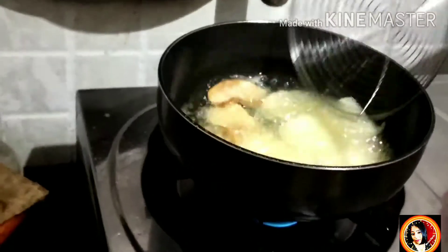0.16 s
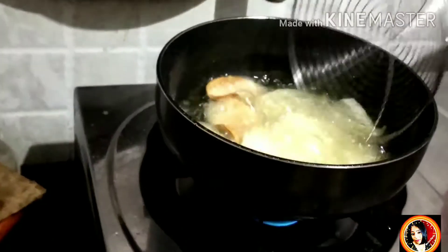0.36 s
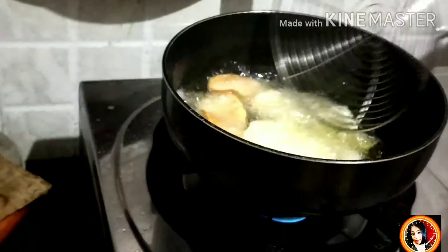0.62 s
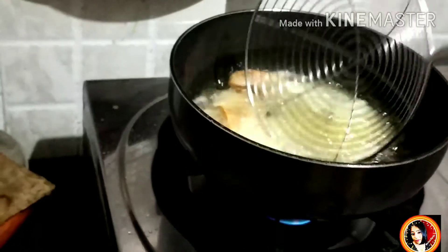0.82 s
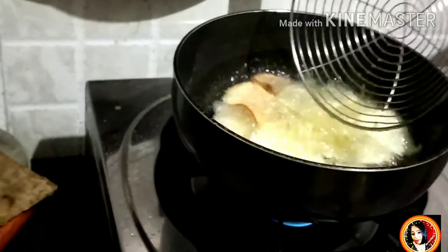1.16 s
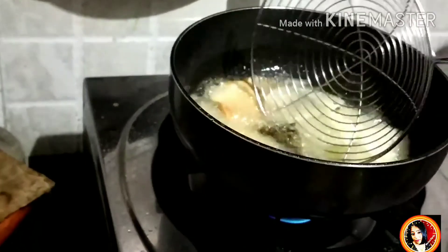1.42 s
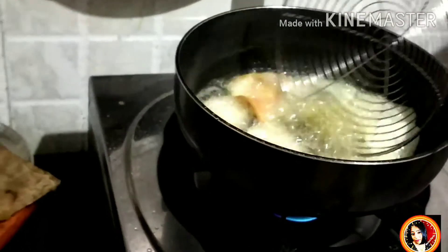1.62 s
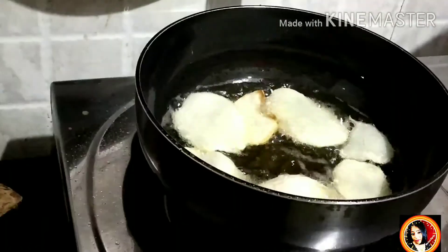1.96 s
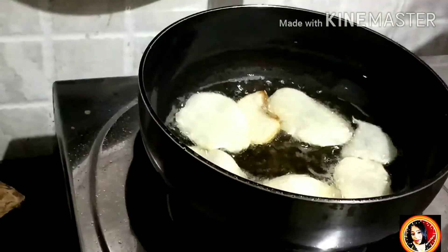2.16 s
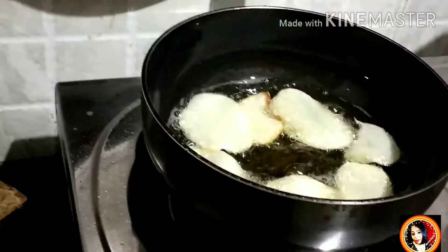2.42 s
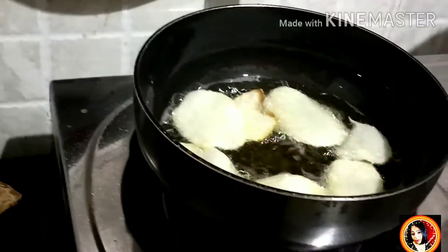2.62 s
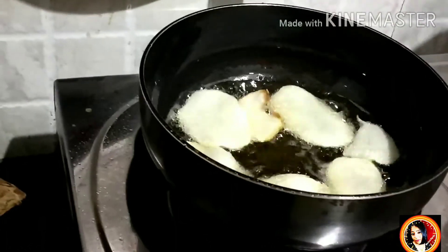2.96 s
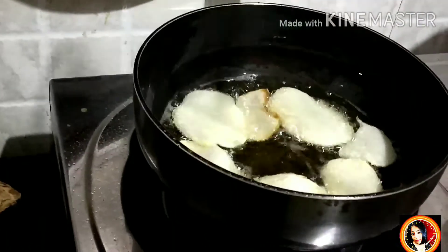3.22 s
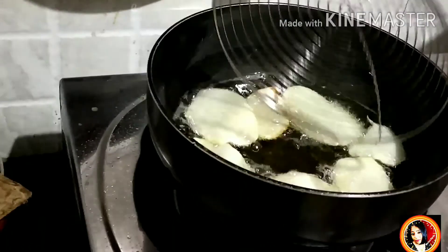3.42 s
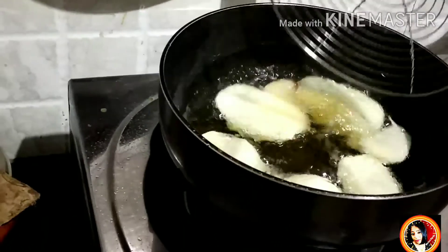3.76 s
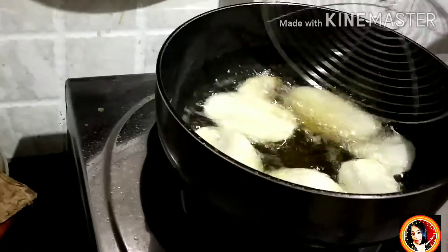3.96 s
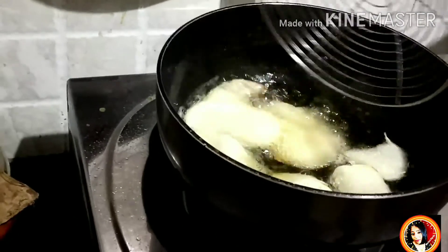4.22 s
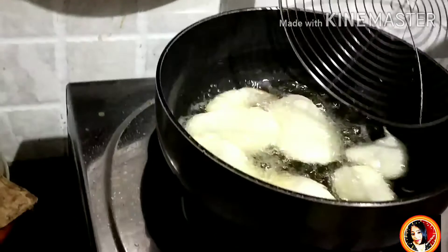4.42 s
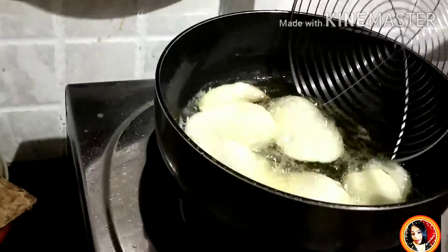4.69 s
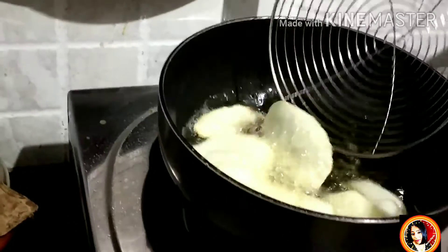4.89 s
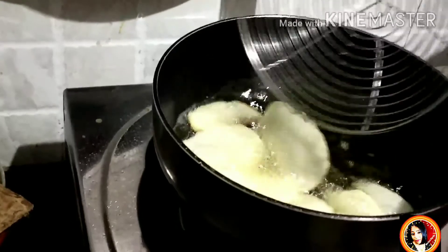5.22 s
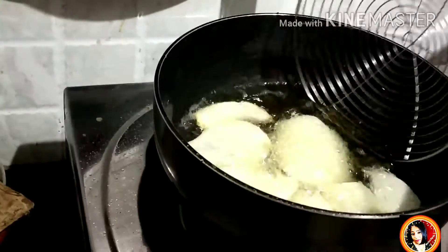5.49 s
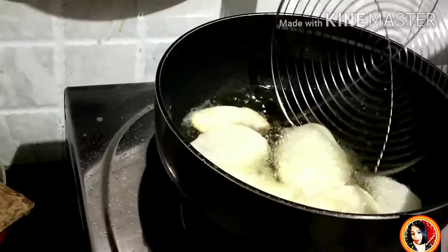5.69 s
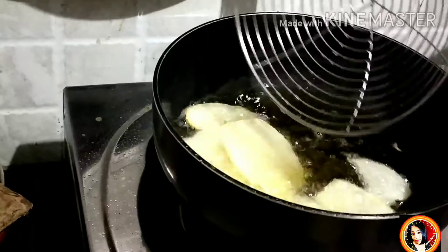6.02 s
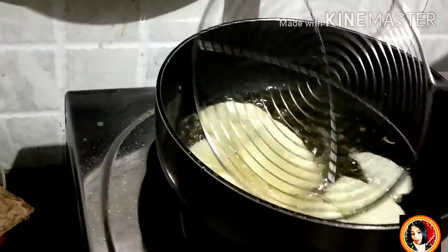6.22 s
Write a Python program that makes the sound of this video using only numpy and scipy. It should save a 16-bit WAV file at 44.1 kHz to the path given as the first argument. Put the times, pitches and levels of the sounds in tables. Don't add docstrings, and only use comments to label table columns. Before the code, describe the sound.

Close-up deep frying: dense hissing and wet pops at first, a metal skimmer bumping the pan, then a sudden change to gentler sizzling with sparse crackles.

```python
import sys
import numpy as np
from scipy import signal
from scipy.fft import rfft, irfft
from scipy.io import wavfile
from scipy.ndimage import uniform_filter1d

SR = 44100
rng = np.random.default_rng(int(sys.argv[2]) if len(sys.argv) > 2 else 0)


def magnitude_from_level(level_db):
    exponent = np.asarray(level_db, float) / 20
    return 10 ** exponent


def master(y):
    cut = np.clip(np.atleast_2d(y).T, -1, 1)
    pcm = np.round(cut * 32767)
    wavfile.write(sys.argv[1], SR, pcm.astype(np.int16))


N = 280476
PORT_LAG_S = 5e-5


def evened(x):
    return x / np.sqrt(np.mean(x ** 2) + 1e-20)


def read(points, hz):
    f, value = np.transpose(points)
    return np.interp(np.log(hz + 1), np.log(f + 1), value)


def curve(rows, axis):
    rows = np.asarray(rows)
    return np.interp(np.arange(N) / SR, rows[:, 0], rows[:, axis])


def add(mix, s, sound):
    part = mix[..., round(s * SR):][..., :sound.shape[-1]]
    part += sound[..., :part.shape[-1]]


def ring(hz, t60, rise_s, glide=0.):
    t = np.arange(int(t60 * SR) + 8) / SR
    tone = np.sin(2 * np.pi * hz * t * (1 + glide * t / t60))
    tone = tone * magnitude_from_level(-60 * t / t60) * (1 - np.exp(-t / rise_s))
    return tone / abs(tone).max()


def echoes(x, t60, gap_s, shared=0.):
    size, taps_per_s = SR // 3, 1500
    t = np.arange(size) / SR
    taps = rng.choice([-1., 1.], (2, size)) * (rng.random((2, size)) < taps_per_s / SR)
    taps = (taps + shared * taps[::-1]) * magnitude_from_level(-60 * t / t60) * (1 - np.exp(-t / gap_s))
    return signal.fftconvolve(np.atleast_2d(x), taps / np.linalg.norm(taps[0]), axes=1)[:, :N]


def centred(x):
    return np.array([x, np.roll(x, -round(PORT_LAG_S * SR))])


def frying(axis):
    # start_s, level_db
    vigour = [(0, 9), (.02, 0.5), (.23, -1), (.35, 0.5), (.8, 2), (.93, 1.5), (1.56, 2.5), (1.89, 0.5),
              (1.9, -2), (2.13, 1.5), (2.67, 4.5), (3.01, 2), (4.15, 4.5), (4.93, 0.5), (5.43, 6),
              (5.79, 0.5), (6.06, 1.5), (6.36, 7.5)]
    # middle_s, fizz_db, boil_db, half_length_s
    lulls = [
        (0.26, -2.5, 2, 0.047),
        (0.368, -7, -1, 0.0098),
        (0.758, -7, 1, 0.04),
        (1.671, -3.5, -6.5, 0.025),
    ]
    change_s, lull_onset = 1.892, 0.53
    fierce_db, calm_db = ((-27.5, -32.5), (-25, -41.5))[axis - 1]
    follows = (0.087, 1)[axis - 1]
    t = np.arange(N) / SR
    db = np.where(t < change_s, fierce_db, calm_db) + follows * curve(vigour, axis=1)
    for lull in lulls:
        half_s = lull[3] * np.where(t < lull[0], lull_onset, 1)
        db = db + lull[axis] * np.exp(-((t - lull[0]) / half_s) ** 2)
    return db


def fizz(patchy_db=1.51, flicker_db=0.5):
    # pitch_hz, level_db (per Hz)
    hiss_colour = [(140, -69), (190, -3.5), (320, -11.5), (3000, -11.5), (4200, -7.5), (6000, -8.5),
                   (11000, -5.5), (15500, -10.5)]
    # pitch_hz, likeness (1 = same)
    likeness = [(60, 0.64), (180, 1), (550, 0.47), (1650, 0.1), (4970, 0.0078), (15000, 0.01)]
    # pitch_hz, half_width_hz, level_db
    reflections = [(400, 22, -1), (2780, 67, 2), (3690, 130, -2), (6980, 76, -2)]
    frames, hz = N // 128 + 5, np.fft.rfftfreq(512, 1 / SR)
    a, b, c, d, patches = rng.standard_normal((frames, len(hz), 5)).T
    patches = evened(uniform_filter1d(uniform_filter1d(patches, 8, axis=0), 20, axis=1))
    flicker = evened(uniform_filter1d(rng.standard_normal(frames), 5))
    same = np.clip(read(likeness, hz), -1, 1)[:, None]
    left, other = a + 1j * b, c + 1j * d
    z = np.array([left, same * left + np.sqrt(1 - same ** 2) * other])
    colour_db = read(hiss_colour, hz)
    for middle_hz, half_width_hz, db in reflections:
        colour_db = colour_db + db * np.exp(-((hz - middle_hz) / half_width_hz) ** 2)
    flicker_band = hz[:, None] > 2500
    z = z * magnitude_from_level(colour_db[:, None] + patchy_db * patches + flicker_db * flicker * flicker_band)
    out = evened(signal.istft(z, nperseg=512, noverlap=384)[1][:, :N])
    return magnitude_from_level(frying(axis=1) + 6.0) * out


def grains(pitches_hz, colour_db, per_s, cycles, spread_db, cross):
    out, count = np.zeros((2, N)), int(per_s / len(pitches_hz) * N / SR)
    for hz, db in zip(pitches_hz, colour_db):
        clicks = np.zeros((2, N))
        strength = magnitude_from_level(db + spread_db * np.minimum(rng.exponential(1, (2, count)), 4))
        np.put_along_axis(clicks, rng.integers(0, N, (2, count)), strength, axis=1)
        bubble = ring(hz, 3 * cycles / hz, 0.37 / hz, glide=0.19)
        out += signal.oaconvolve(clicks, bubble[None], axes=1)[:, :N]
    return evened(out + cross * out[::-1])


def boil():
    # pitch_hz, level_db
    bubble_colour = [(250, -66), (500, -19.5), (1000, -10), (2000, 2.5), (3000, 4), (4100, 5.5), (4700, 5)]
    hz = np.geomspace(260, 4500, 22)
    near = grains(hz, read(bubble_colour, hz), per_s=1500, cycles=4, spread_db=2.6, cross=.4)
    wet = near + magnitude_from_level(-5) * echoes(near, t60=.12, gap_s=.003)
    size_limits = signal.butter(6, [210, 4600], "band", fs=SR, output="sos")
    return magnitude_from_level(frying(axis=2) - 1.0) * evened(signal.sosfilt(size_limits, wet))


def crackle():
    hz = np.geomspace(5000, 14000, 8)
    ticks = grains(hz, 0 * hz, per_s=510, cycles=3.5, spread_db=7.5, cross=0.012)
    return magnitude_from_level(frying(axis=1) - 15.0) * ticks


def pops():
    # start_s, peak_db, pitch_hz,
    # length_cycles
    open_bursts = [(0.168, -7.5, 4100, 3.5), (0.21, -12, 2520, 4), (0.22, -6.5, 3360, 3.4),
                   (0.3282, -5, 2880, 6.1), (0.3388, -10, 1860, 7.1), (0.3586, -1.5, 1640, 4.5),
                   (0.4398, 4.5, 1830, 1.3), (0.5024, -7, 930, 0.73), (0.8019, -6.5, 1730, 1.6),
                   (0.496, -3.5, 2230, 4), (0.5333, -7.5, 1980, 7.5), (0.575, -6, 2590, 11),
                   (0.66, -4.5, 2470, 7.3), (0.5314, -5, 1690, 0.91), (0.7257, -7, 2600, 4.5),
                   (0.7328, -3, 2500, 1.5), (0.804, -10.5, 1460, 13), (0.814, -16, 1490, 11),
                   (0.822, -13, 1580, 10), (0.629, -13, 2100, 4.1), (1.381, -12, 1700, 2.4),
                   (1.0905, -4, 2120, 5.3), (1.162, -11, 2770, 11), (1.421, -10, 2780, 8),
                   (1.4485, -6.5, 2450, 11), (1.563, -6, 1500, 0.85), (1.587, -7.5, 1620, 0.95),
                   (1.606, -8, 2160, 3.4), (1.725, -10, 2630, 6.6), (1.744, -2.5, 1830, 2.1),
                   (1.77, -8, 2800, 4.6), (1.785, -7, 1940, 1), (1.879, -15.5, 2820, 4.2)]
    # start_s, peak_db, pitch_hz, length_cycles
    calm_bursts = [(2.596, -13, 3020, 5.3), (2.6888, -13.5, 3900, 12), (3.211, -12, 6640, 10),
                   (3.382, -15, 3920, 13), (3.515, -24, 4480, 7.7), (3.5646, -10, 2900, 2.1),
                   (3.5, -19.5, 2700, 18), (3.568, -16, 5000, 5.6), (3.4, -21, 2800, 4),
                   (3.3825, -21, 4600, 4), (2.5945, -21, 3800, 3), (5.2618, -21, 1300, 1.4),
                   (3.5178, -20, 5800, 4), (3.763, -23.5, 1800, 3.2), (3.832, -24, 3100, 2),
                   (3.8318, -18, 2700, 11), (3.972, -12, 2600, 14), (3.975, -20, 2700, 9.6),
                   (4.635, -17.5, 4000, 9.8), (5.262, -14.5, 2400, 7.9), (5.4015, -19, 2400, 5),
                   (6.246, -18, 3300, 2.5), (6.265, -17, 2380, 6.4), (5.323, -23, 4500, 3),
                   (2.599, -19, 3020, 12)]
    # start_s, peak_db, pitch_hz
    covered_bursts = [(0.035, -19, 2070), (0.074, -5, 3550), (0.112, -12, 2600), (0.198, -17, 1880),
                      (0.31, -14, 2780), (0.418, -14, 1680), (0.611, -21, 2630), (1.016, -24, 3300),
                      (1.042, -16, 2390), (1.126, -5, 3300), (1.219, -13, 1500), (1.236, -9.5, 1540),
                      (1.277, -15, 2670), (1.311, -4.5, 2610), (0.97, -16, 2410), (0.711, -13, 2360),
                      (0.911, -13, 1970), (1.396, -5, 2980), (1.543, -7, 2750), (1.701, -13, 3350),
                      (1.805, -6, 2230), (1.824, -8, 2180)]
    # start_s, peak_db, pitch_hz
    droplet_cracks = [(0.1303, -7.5, 9600), (0.4084, -19, 6360), (0.621, -13, 8610), (0.7991, -17, 7950),
                      (0.9344, -11, 10700), (0.9507, -5, 10000), (0.9565, -16, 9000), (0.9784, -17, 12600),
                      (1.0264, -17, 9680), (1.098, -8, 7290), (1.3528, -23, 9650), (1.4236, -16, 6320),
                      (1.487, -1.5, 10400), (1.6544, -10, 11000), (1.7114, -16, 11700),
                      (1.8715, -19, 10000), (2.2166, -17, 10200), (2.6054, -16, 7970), (3.2124, -21, 6620),
                      (3.4164, -17, 9700)]
    near, far, splash = np.zeros((3, N))
    bursts = [(s, db, hz, cycles, -2.5) for s, db, hz, cycles in open_bursts]
    bursts += [(s, db + .5, hz, cycles, -5.5) for s, db, hz, cycles in calm_bursts]
    bursts += [(s, db - 4, hz, 5.5, 4) for s, db, hz in covered_bursts]
    for s, db, hz, cycles, echo_db in bursts:
        rise_s = (0.24 + 0.032 * cycles) / hz
        burst = magnitude_from_level(db - 0.5) * ring(hz, 3 * max(cycles, 1) / hz, rise_s, glide=0.0066)
        film_tear = magnitude_from_level(db - 9) * ring(.6 * hz, 2.5 / hz, .15 / hz)
        add(near, s + 0.00038, -burst)
        add(near, s + .0004, -film_tear)
        add(far, s, magnitude_from_level(echo_db) * burst)
        add(splash, s, magnitude_from_level(db - 10.0) * ring(hz, 10.0 / hz, 0.44 / hz))
    for s, db, hz, _ in calm_bursts:
        cavity_snap = magnitude_from_level(db - 7) * ring(.42 * hz, 2.2 / hz, .12 / hz)
        add(near, s, cavity_snap)
        add(splash, s, magnitude_from_level(db - 15) * ring(hz, 14 / hz, 0.1 / hz))
        add(splash, s, magnitude_from_level(db - 13) * ring(1.24 * hz, 4 / hz, .25 / hz))
    for s, db, hz in droplet_cracks:
        crack = magnitude_from_level(db + 3) * ring(hz, 11 / hz, .5 / hz)
        add(near, s, crack)
        add(far, s, .45 * crack)
    drops = echoes(splash, t60=.035, gap_s=.002, shared=.4)
    both = centred(near) + drops + echoes(far, t60=0.2, gap_s=0.0031)
    no_bass = signal.butter(2, 500, "high", fs=SR, output="sos")
    return signal.sosfilt(no_bass, both)


def blips(lift_db=-4.5, echo_db=2.0):
    # middle_s, peak_db, pitch_hz, half_height_cycles
    fierce_blips = [(0.004, -16, 1520, 8.6), (0.0631, -17, 2920, 8.2), (0.124, -17, 2530, 5.8),
                    (0.1306, -11.5, 3840, 7.4), (0.1319, -19, 2640, 6.7), (0.158, -20, 1610, 3.4),
                    (0.2034, -17, 1740, 6.7), (0.3236, -7.5, 5550, 3.8), (0.3479, -21, 2410, 4.6),
                    (0.3683, -26, 1610, 5.2), (0.38, -17, 1840, 3.7), (0.3847, -20, 1720, 4.1),
                    (0.5171, -22, 694, 2.8), (0.5259, -19, 815, 3.4), (0.675, -12, 1840, 3.3),
                    (0.6994, -19, 2180, 4.7), (0.8357, -17, 1500, 10), (0.8524, -18, 1720, 4.0),
                    (0.873, -21, 1610, 4.0), (0.8795, -20, 2360, 3.1), (0.9608, -20, 820, 3),
                    (1.008, -19, 2420, 4.8), (1.0512, -22.5, 795, 3.5), (1.0808, -22, 2100, 5.1),
                    (1.1016, -20, 2200, 4.7), (1.1019, -15, 3420, 11.4), (1.1531, -22.5, 790, 5.6),
                    (1.1533, -7.5, 3900, 4.6), (1.1546, -14, 2070, 4.1), (1.249, -17, 2760, 4.6),
                    (1.2535, -15, 950, 3.4), (1.2683, -17, 4150, 11.2), (1.294, -19, 2740, 11),
                    (1.3035, -17, 3020, 4.9), (1.339, -12, 2660, 10), (1.3385, -17, 1390, 4.2),
                    (1.347, -14, 1830, 3.1), (1.364, -13, 2410, 4.0), (1.463, -14, 2640, 4.4),
                    (1.4988, -24, 690, 4.2), (1.5079, -27, 690, 4.8), (1.5714, -17, 2640, 7.7),
                    (1.5998, -24, 3050, 11), (1.6012, -21, 1490, 6.8), (1.622, -21, 2370, 12.4),
                    (1.7553, -9, 1640, 5.0), (1.8438, -13, 2180, 3.5), (1.873, -20, 2100, 12),
                    (1.875, -12, 4070, 4.5), (1.888, -21, 1840, 3.4)]
    # middle_s, peak_db, pitch_hz, half_height_cycles
    calm_blips = [(2.2044, -21, 4250, 7.3), (2.2169, -11, 5300, 3.5), (2.6043, -15, 4250, 5.9),
                  (2.609, -19, 2990, 8.3), (2.6154, -21, 2970, 11.3), (2.6222, -26, 3080, 7.7),
                  (2.6318, -20, 2990, 3.8), (2.6946, -13.5, 3400, 16.8), (3.2491, -28, 1510, 5.1),
                  (3.403, -21, 4370, 7.0), (3.5581, -24, 2870, 4.0), (3.578, -18, 3401, 9.0),
                  (3.5822, -19, 5200, 6.3), (3.6, -20, 2180, 3.4), (3.6154, -24, 3430, 7.0),
                  (3.9916, -27, 2410, 5.3), (4.0052, -28, 2530, 13.0), (4.0116, -21, 2640, 4.4),
                  (4.211, -27, 2540, 8.1), (4.553, -27, 960, 4.2), (5.2797, -29, 2373, 10.8),
                  (5.3236, -24, 1490, 3.0), (5.479, -15, 4300, 3.2), (5.482, -16, 3330, 3.2),
                  (5.6542, -17.5, 4660, 4.0)]
    out = np.zeros(N)
    for s, db, hz, cycles in [*fierce_blips, *calm_blips]:
        size = int(2 * cycles / hz * SR)
        tone = np.hanning(size) * np.sin(2 * np.pi * hz * np.arange(size) / SR)
        add(out, max(s - cycles / hz, 0), magnitude_from_level(db + lift_db) * tone)
    return out + magnitude_from_level(echo_db) * echoes(out, t60=0.06, gap_s=0.001)


def pan():
    # start_s, peak_db, pitch_hz
    bumps = [(0.437, -34, 222), (0.467, -25.5, 313), (0.504, -25, 267), (0.624, -28.5, 260),
             (0.884, -28, 340), (1.465, -21, 317), (1.514, -40, 310), (1.534, -24, 298), (1.555, -22, 268),
             (1.58, -30, 261), (1.603, -32.5, 267), (1.701, -32.5, 257), (3.652, -39, 273),
             (4.214, -26, 249), (4.278, -37, 259), (4.483, -28, 294), (4.546, -31.5, 321),
             (5.015, -48, 253), (5.994, -43, 255), (6.302, -30.5, 264), (4.444, -26, 337.2),
             (4.466, -22, 265.5), (4.52, -25, 251.5), (4.604, -31.5, 273), (4.698, -39, 274),
             (4.907, -37, 210), (5.335, -30.5, 287), (5.345, -29, 255), (5.363, -29, 264),
             (5.399, -33, 252), (5.452, -31, 275), (5.463, -26, 253), (5.498, -24, 325), (5.605, -28, 285),
             (5.92, -30, 302), (6.148, -33, 260), (6.278, -29.5, 294)]
    # start_s, peak_db
    knocks = [(0.885, -12), (0.894, -13), (0.905, -19), (1.465, 7.5), (1.4738, -8), (1.4795, 1),
              (1.4855, -7), (1.531, -5.5), (1.541, -15), (1.552, -15), (4.5, -20)]
    # pitch_hz, level_db, t60_s
    pan_tones = [(69.6, -11, 0.034), (574.5, -6.5, 0.19), (634, -3, 0.051), (704, 3.5, 0.021),
                 (790, -8.5, 0.02), (1260, -12.5, 0.028)]
    # start_s, peak_db
    tinks = [
        (5.48, -11),
        (5.494, -14.5),
    ]
    # pitch_hz, level_db, t60_s
    mesh_tones = [(6331, -12, .035), (7660, 0, .05), (8960, 0, .025), (10650, -4, .03), (12360, -7, .03),
                  (12930, -9, .025), (14130, -6, .03)]
    wall_t60_s, lean = 0.11, 5.5 * np.array([[-.5], [.5]])
    low, high = np.zeros((2, N)), np.zeros(N)
    for s, db, hz in bumps:
        partner_hz = hz * (1.2 if hz < 285 else .83)
        add(low, s, magnitude_from_level(db - 3.5) * ring(hz, wall_t60_s, 0.0068))
        add(low, s, magnitude_from_level(db - 7) * ring(partner_hz, wall_t60_s, 0.0048))
    for s, db in knocks:
        for k, (hz, tone_db, t60) in enumerate(pan_tones):
            lean_db = (-1) ** k * lean
            add(low, s + 0.00073, magnitude_from_level(db + tone_db + lean_db - 17.0) * ring(hz, t60, 0.0016))
    for s, db in tinks:
        for hz, tone_db, t60 in mesh_tones:
            add(high, s, magnitude_from_level(db + tone_db - 9.5) * ring(hz, t60, 0.0006))
        add(high, s, magnitude_from_level(db - 10) * ring(4200, .0015, .0002))
    wall = low + magnitude_from_level(-6) * echoes(low, t60=.15, gap_s=.004, shared=.25)
    return wall + centred(high) + .3 * echoes(high, t60=0.03, gap_s=.003)


def flame(hz=198, width_hz=4.4):
    # start_s, level_db
    drone = [(0, -53.5), (1.5, -52), (1.95, -47), (2.7, -47), (3.7, -57.5), (4.5, -44.5), (5.2, -56),
             (6.36, -51)]
    b, a = signal.iirpeak(hz, hz / width_hz, SR)
    return magnitude_from_level(curve(drone, axis=1)) * evened(signal.lfilter(b, a, rng.standard_normal(N)))


def kitchen(db=-71, low_hz=130, top_hz=150):
    a, b = rng.standard_normal((2, 2, N))
    high_pass = signal.butter(2, 0.69 * low_hz, "high", fs=SR, output="sos")
    low_pass = signal.butter(2, top_hz, "low", fs=SR, output="sos")
    return magnitude_from_level(db) * evened(signal.sosfilt(np.vstack([high_pass, low_pass]), a[0] + 0.31 * b))


def gain_dips():
    # start_s, left_depth_db, right_depth_db, recovery_s
    ducks = [(0.048, 3.5, 2.5, 0.081), (0.245, 6.5, 15, 0.033), (.362, -0.5, 5.5, 0.054),
             (0.438, 6, 9.5, 0.033), (0.738, 0.5, 12, 0.031), (.799, 0.5, 0.5, 0.023), (.957, 5, -2, 0.012),
             (1.387, 4.5, 4.5, 0.03), (1.467, 4.5, 4, 0.057), (1.494, 4, 2.5, 0.066),
             (1.668, 6, 3.5, 0.091), (1.893, 19, 7, 0.0096)]
    t, dip_db = np.arange(N) / SR, np.zeros((2, N))
    for s, left_db, right_db, back_s in ducks:
        after = np.maximum(t - s, 0) / back_s
        dip_db += np.outer([left_db, right_db], (t > s) * np.exp(-after ** 2))
    return uniform_filter1d(dip_db, 90, axis=1)


def scene():
    steady = fizz() + boil() + crackle() + flame() + pops() + blips()
    return steady / magnitude_from_level(gain_dips()) + pan()


def thinned(x, share=.925, from_hz=3200, floor_db=-16):
    hz, _, z = signal.stft(x, SR, nperseg=2048, noverlap=1536)
    level = abs(z).mean(axis=0)
    narrow = uniform_filter1d(uniform_filter1d(level, size=6, axis=0), size=5, axis=1)
    wide = np.exp(uniform_filter1d(np.log(narrow + 1e-12), size=40, axis=0))
    weak = (narrow < share * wide) & (hz[:, None] > from_hz)
    return signal.istft(z * np.where(weak, magnitude_from_level(floor_db), 1), SR, nperseg=2048, noverlap=1536)[1][:, :N]


def band_limit(x):
    return signal.sosfilt(signal.butter(12, 15920, fs=SR, output="sos"), x)


def record(dry):
    # pitch_hz, left_minus_right_db
    port_colour = [(60, 0.0), (130, 3), (290, 1.5), (640, 1.5), (1410, -2.5), (3100, -3.5), (6820, 1.5),
                   (15000, 3)]
    hz = np.fft.rfftfreq(N, 1 / SR)
    tilt = magnitude_from_level(np.outer([.5, -.5], read(port_colour, hz)))
    lag = np.exp(-2j * np.pi * np.outer([0, PORT_LAG_S], hz))
    bass_cut = 1 / np.sqrt(1 + (170 / (hz + 1)) ** 6)
    top_cut = np.clip((15950 - hz) / 450, 0, 1) ** 2
    rounded = 1.09 * np.tanh(dry / 1.107)
    heard = irfft(rfft(rounded) * tilt * lag * bass_cut * top_cut, N) + kitchen()
    return band_limit(thinned(heard))


dry = scene()
out = record(dry)
master(out)
```